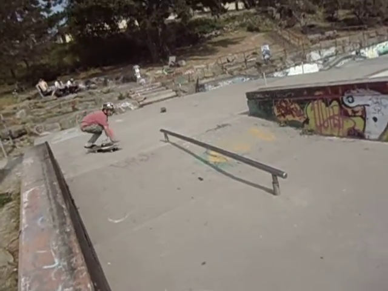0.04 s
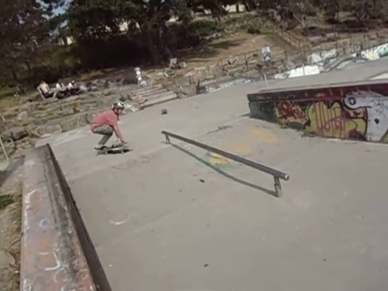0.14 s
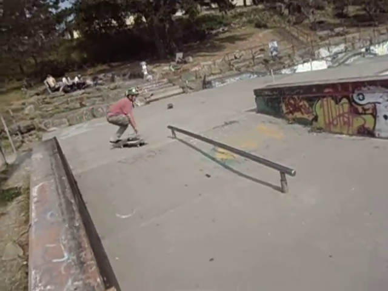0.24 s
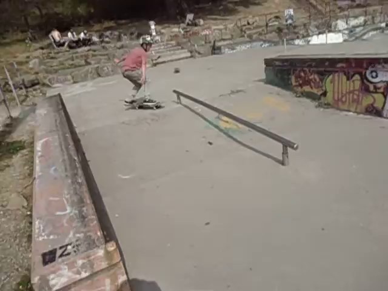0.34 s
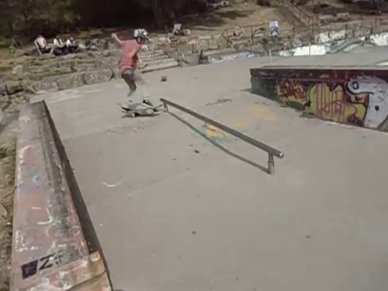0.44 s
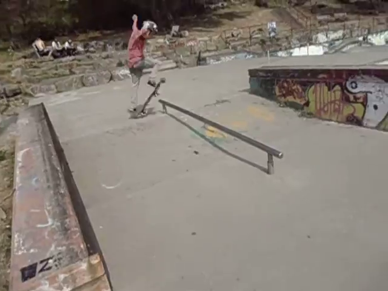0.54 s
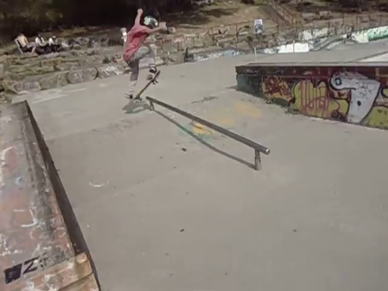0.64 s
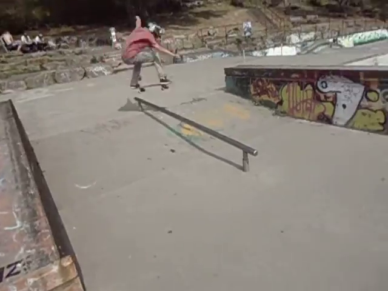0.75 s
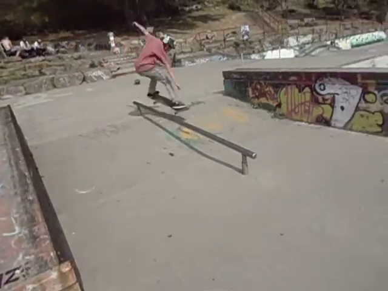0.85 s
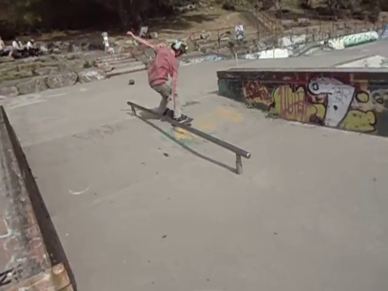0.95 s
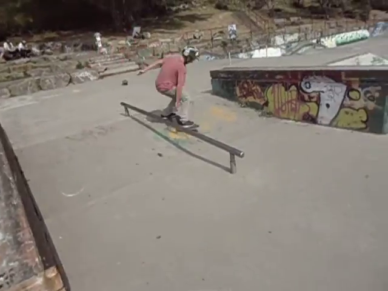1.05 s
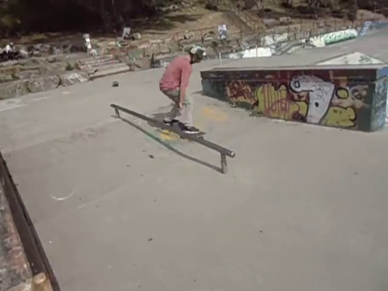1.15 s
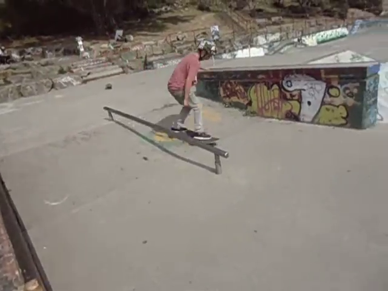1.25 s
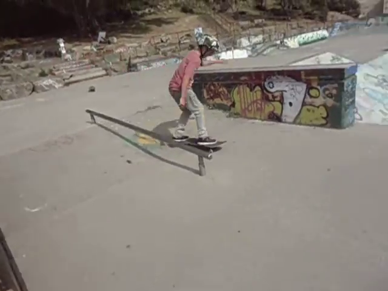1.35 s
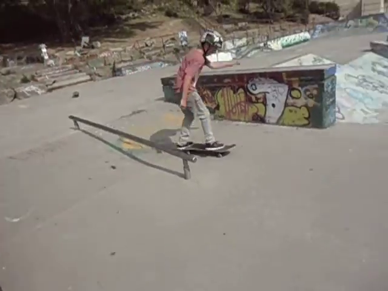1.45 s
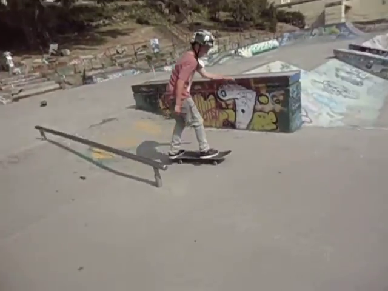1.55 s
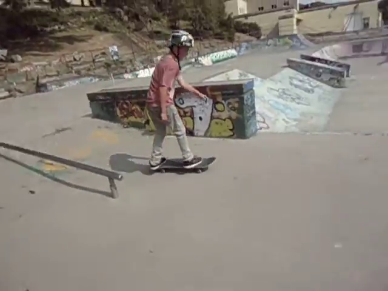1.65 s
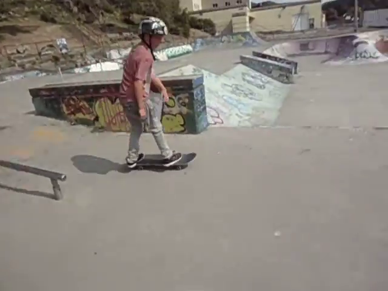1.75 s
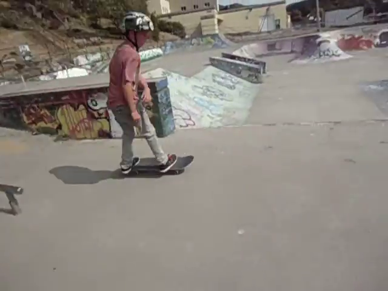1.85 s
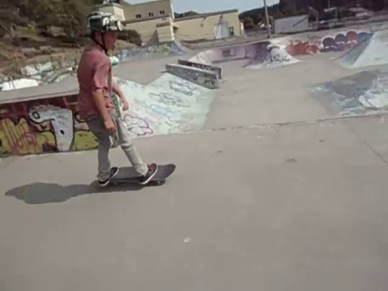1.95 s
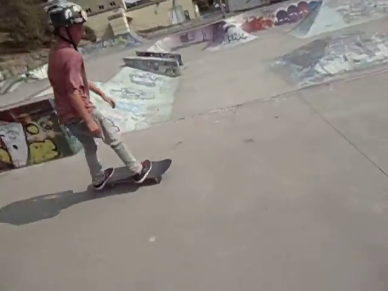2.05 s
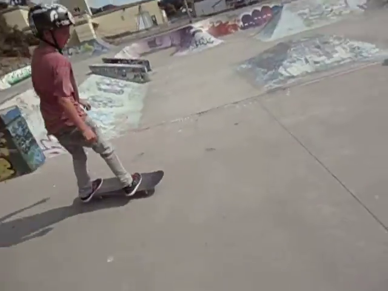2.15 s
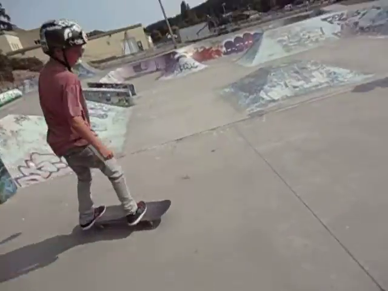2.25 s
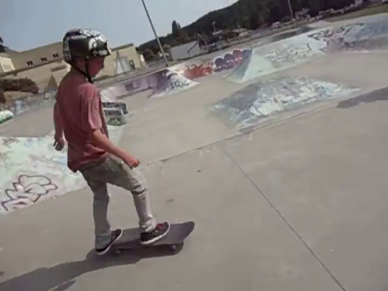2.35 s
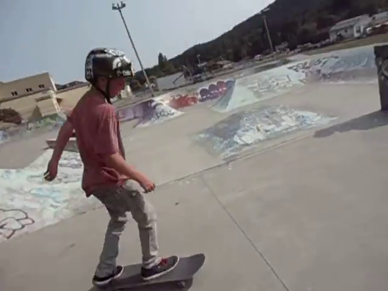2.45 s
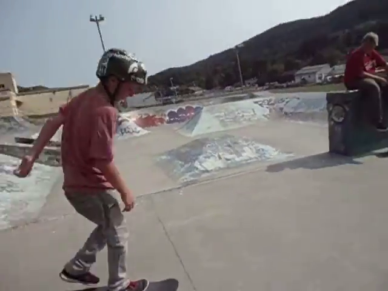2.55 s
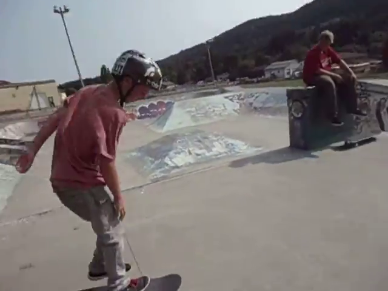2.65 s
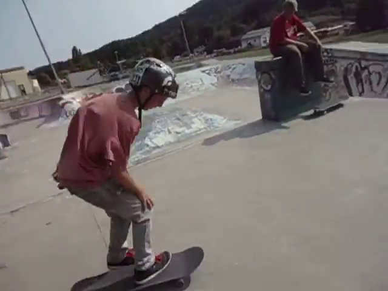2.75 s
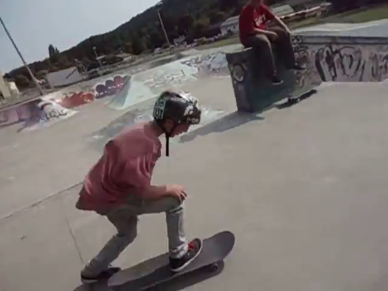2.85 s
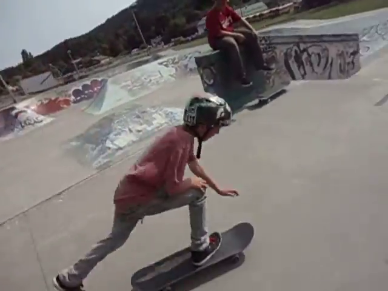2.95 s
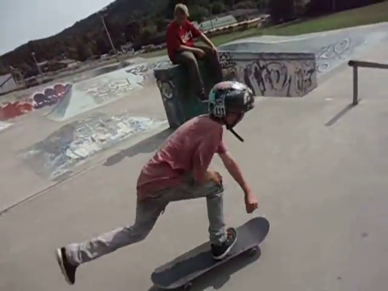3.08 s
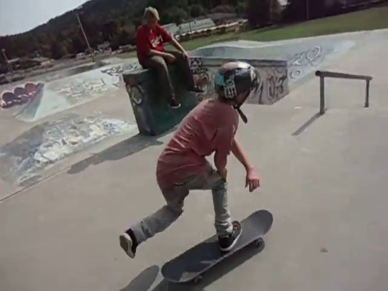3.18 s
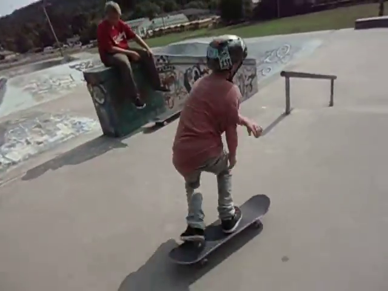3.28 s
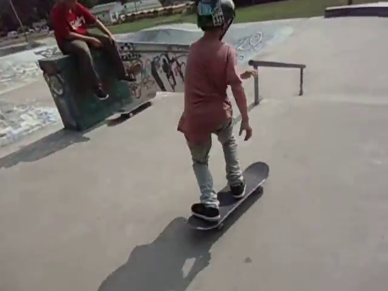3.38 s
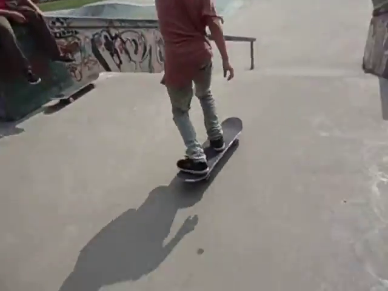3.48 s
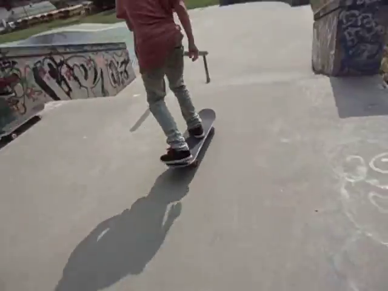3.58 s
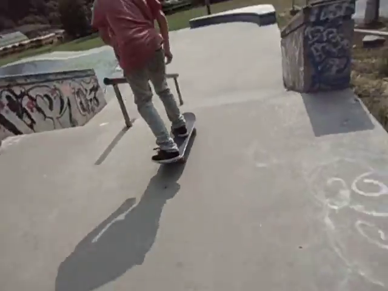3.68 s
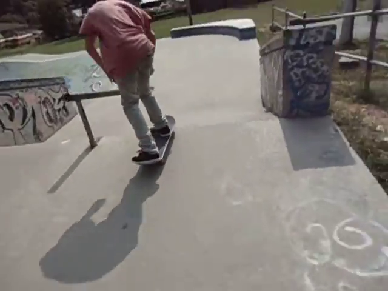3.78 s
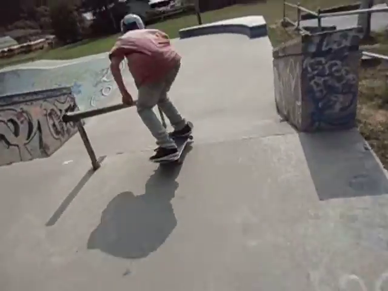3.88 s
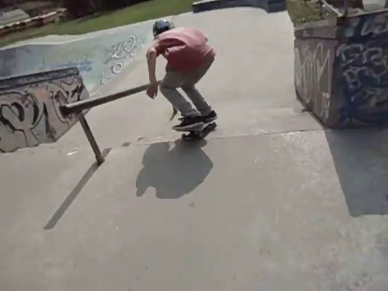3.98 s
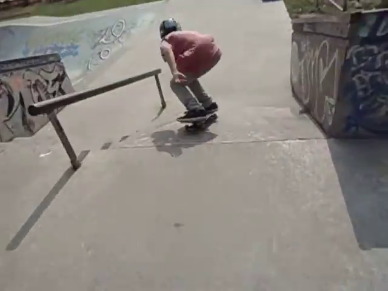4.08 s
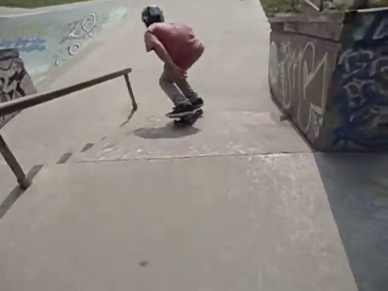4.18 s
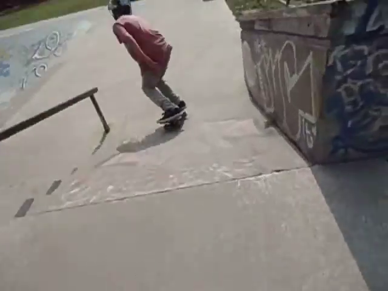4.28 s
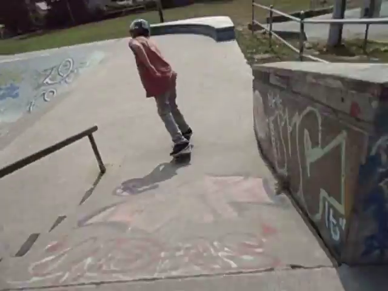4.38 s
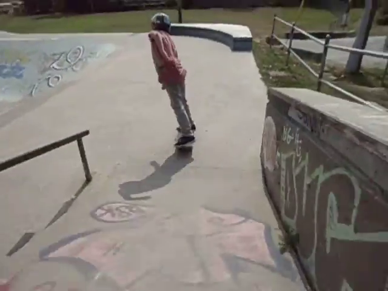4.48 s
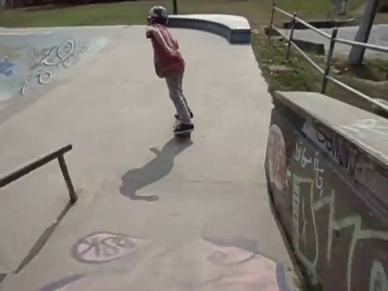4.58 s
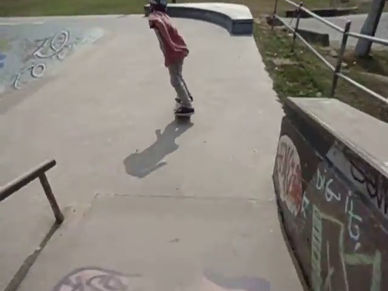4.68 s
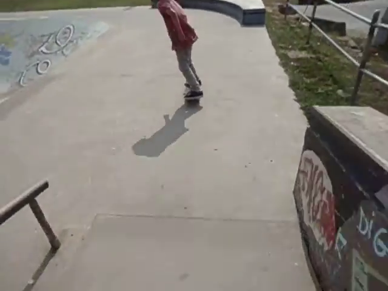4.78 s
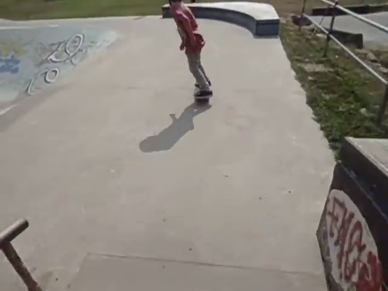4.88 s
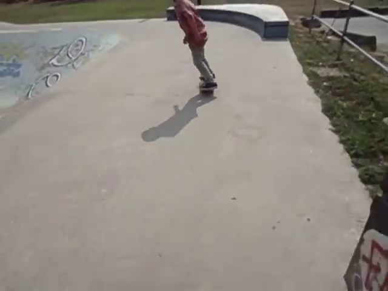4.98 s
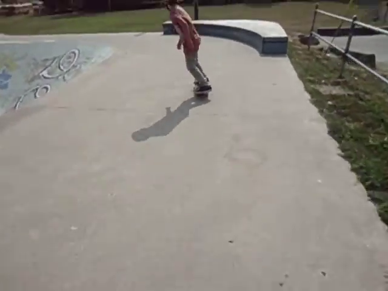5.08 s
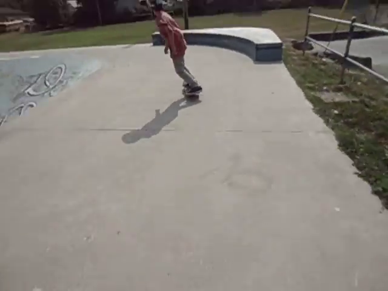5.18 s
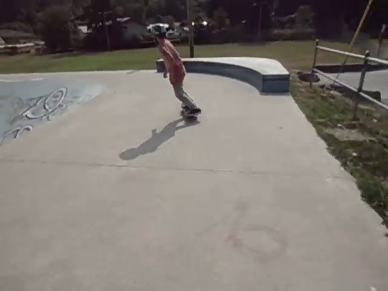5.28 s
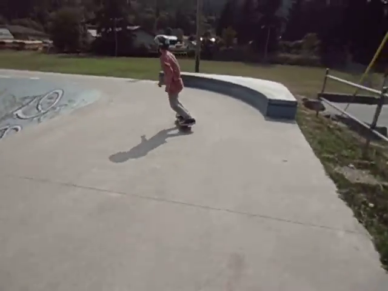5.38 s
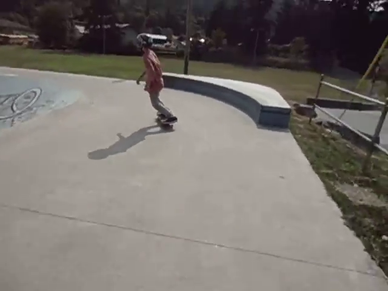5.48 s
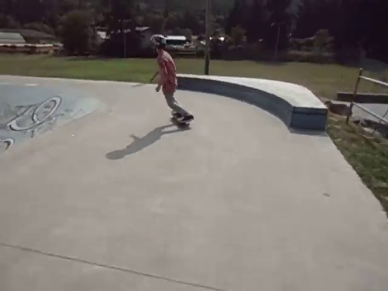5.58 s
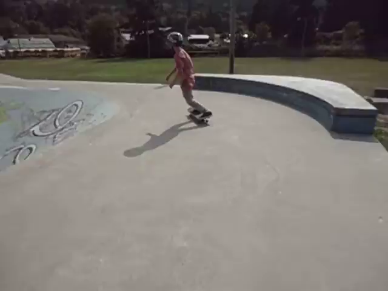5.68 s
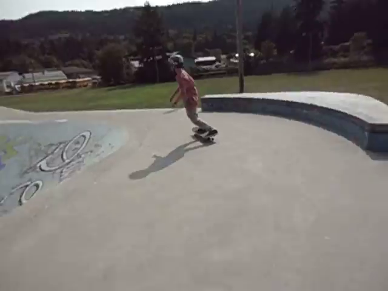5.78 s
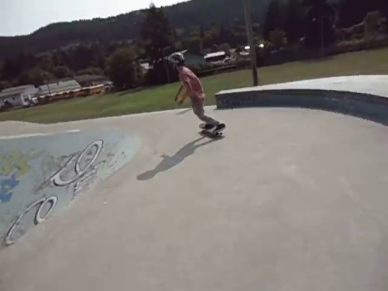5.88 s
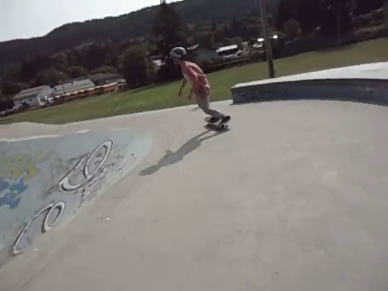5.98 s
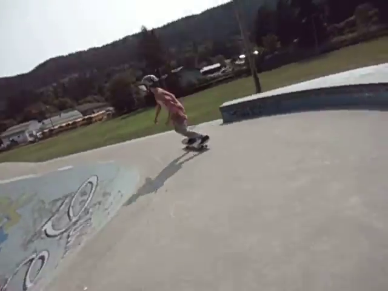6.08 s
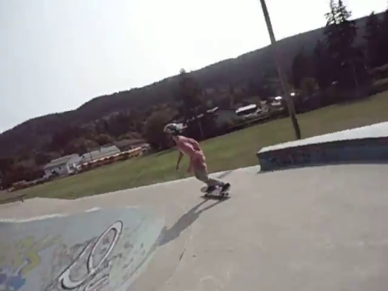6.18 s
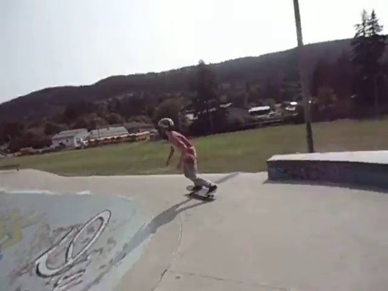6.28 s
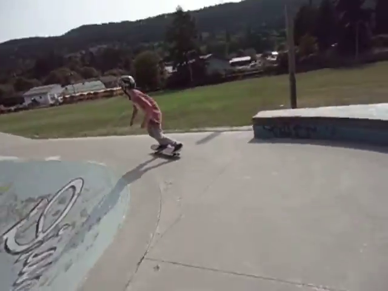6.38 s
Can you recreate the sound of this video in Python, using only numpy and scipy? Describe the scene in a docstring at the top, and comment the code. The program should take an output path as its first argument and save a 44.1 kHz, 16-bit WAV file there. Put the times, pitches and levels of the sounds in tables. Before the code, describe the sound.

Skateboard wheels rumble over smooth, then rough concrete outdoors, with loud board clacks, a short rail scrape and gusts of wind.

```python
"""Skateboarder in a concrete park.

Followed on foot with a small camera, he pops onto a steel rail, grinds, drops off, pushes past, hops a
ridge and carves away over rougher concrete. The wheels rumble over the grain of the ground; grit and
sharp blows ring the deck and trucks. Wind buffets the microphone, once with a thud and a brief rasp."""
import sys
import numpy as np
from scipy import signal
from scipy.fft import rfft, irfft, next_fast_len
from scipy.io import wavfile
from scipy.ndimage import uniform_filter1d

SR = 44100
rng = np.random.default_rng(int(sys.argv[2]) if len(sys.argv) > 2 else 0)


def master_out(mix):
    """Clip the mix to full scale and print it as 16-bit PCM to the path in sys.argv[1]."""
    frames = np.transpose(np.atleast_2d(mix))
    ceiling = np.clip(frames, -1, 1)
    pcm = np.round(ceiling * 32767).astype(np.int16)
    wavfile.write(sys.argv[1], SR, pcm)


N = 283563
TIME = np.arange(N) / SR

# maple deck modes (frequency [Hz], level [dB], t60 [s])
DECK_MODES = [(215, -7, 0.045), (312, -12, 0.03), (515, 0, 0.05), (690, 0, 0.04), (990, -.5, 0.05),
              (1300, -4, 0.045), (1600, -8, 0.035), (2090, -1, 0.035), (2400, -1.5, 0.038),
              (2780, -.5, .034), (3024, -6, .03), (4170, -4, .018), (4490, -4, 0.02)]


def undb(db):
    """Decibels to gain."""
    return np.exp(np.asarray(db) * (np.log(10) / 20))


def unit(x):
    """Scale to rms 1."""
    return x / np.sqrt(np.mean(x ** 2))


def add(out, s, x):
    """Mix x in at time s."""
    i = int(s * SR)
    out[i:i + len(x)] += x[:N - i]


def ramp(s, length_s):
    """Linear rise from 0 to 1, centred on time s."""
    return np.clip((TIME - s) / length_s + .5, 0, 1)


def held(start_s, end_s, rise_s, fall_s):
    """Attack, hold, release."""
    return ramp(start_s, rise_s) * (1 - ramp(end_s, fall_s))


def swell(s, half_s):
    """Bell envelope around time s."""
    return np.exp(-np.minimum(((TIME - s) / half_s) ** 2, 20))


def walk(rate_hz):
    """Smooth random drift, rms 1."""
    k = int(SR / rate_hz)
    steps = np.repeat(rng.standard_normal(N // k + 1), k)
    return unit(uniform_filter1d(steps, k)[:N])


def grains(rate_hz, spread_db):
    """Random tiny impacts, a few much larger than the rest; rms 1."""
    size = undb(spread_db * np.minimum(rng.exponential(size=N), 4))
    return unit((rng.random(N) < rate_hz / SR) * size * rng.choice([-1, 1], N))


def colour(x, spectrum):
    """Filter by (frequency [Hz], gain [dB]) points, -20 dB/oct beyond the ends; rms 1."""
    hz, db = np.transpose(spectrum)
    size = next_fast_len(N, True)
    octave, points = np.log2(np.fft.rfftfreq(size, 1 / SR) + 1), np.log2(hz)
    outside_oct = np.abs(octave - np.clip(octave, points[0], points[-1]))
    gain = undb(np.interp(octave, points, db) - 20 * outside_oct)
    return unit(irfft(rfft(x, size) * gain, size)[:N])


def decay(t, t60_s):
    """Exponential fall, 60 dB in t60_s."""
    return np.exp(-np.log(1000) * t / t60_s)


def ring(modes, t):
    """Decaying modes after one tap; neighbours in antiphase."""
    return sum((-1) ** k * undb(db) * np.sin(2 * np.pi * hz * t) * decay(t, t60_s)
               for k, (hz, db, t60_s) in enumerate(modes))


def strikes(hits, modes, crack_db, crack_t60_s, crack_hz):
    """Each hit is a tap plus contact chatter, ringing the modes over a short noise crack."""
    out, t = np.zeros(N), TIME[:SR // 4]
    octave = np.log2(np.clip(np.fft.rfftfreq(2 * len(t), 1 / SR), 300, 3800) / 1500)
    band = signal.butter(1, crack_hz, "band", fs=SR, output="sos")
    for s, db, tilt_db_oct, chatter_s in hits:
        # rider's weight and contact point shift the modes on each hit
        jitter = rng.standard_normal((len(modes), 2))
        shifted = [(hz * (1 + 0.018 * a), mode_db + 1.7 * b, t60_s)
                   for (hz, mode_db, t60_s), (a, b) in zip(modes, jitter)]
        chatter = (rng.random(len(t)) < 2500 / SR) * rng.standard_normal(len(t)) * np.exp(-t / chatter_s)
        force = chatter / (np.linalg.norm(chatter) + 1e-9)
        force[0] += 1
        ringing = 0.051 * signal.fftconvolve(unit(ring(shifted, t)), force)[:len(t)]
        # longer chatter: longer crack, same energy
        length_s = crack_t60_s + 4 * chatter_s
        noise = unit(signal.sosfilt(band, rng.standard_normal(len(t))))
        crack = undb(crack_db) * np.sqrt(crack_t60_s / length_s) * noise * decay(t, length_s)
        tilted = irfft(rfft(ringing + crack, 2 * len(t)) * undb(tilt_db_oct * octave))
        add(out, s, undb(db) * tilted[:len(t)])
    return out


def rolling(roughness, rumble_db, grit_db, rattle_db):
    """Wheels run over the grain of the concrete; the level flutters as they turn."""
    # rumble on smooth ground, on rough ground and in a carve (frequency [Hz], gain [dB])
    smooth_eq = [(120, -1), (300, -4), (430, -6), (520, 2.5), (610, -2), (720, 0.5), (860, -11.5),
                 (1100, -5.5), (1300, -7.5), (1500, -18), (2200, -37)]
    rough_eq = [(80, -30), (170, -1.5), (320, 3), (520, 0.5), (650, -8), (850, -3), (1100, -5), (1400, -10),
                (1800, -30), (2600, -20.5)]
    carve_eq = [(100, -22), (200, -17.5), (330, 1.5), (430, -0.5), (510, 4.5), (700, -2), (850, -2),
                (1000, -7.5), (1200, -7.5), (1500, -28.5), (2200, -30)]
    # crushed grit, rattling bearings (frequency [Hz], gain [dB])
    grit_eq = [(900, -15), (1400, 8), (1700, 1.5), (2200, -3.5), (2700, -15.5), (3500, -23)]
    rattle_eq = [(2000, -23.5), (2900, 1), (3400, 3), (3850, -1), (4450, 2.5), (5100, 3.5), (6000, 1.5)]
    spin_hz = 21 * (1 + 0.14 * walk(4.1))
    flutter_db = 0.22 * np.sin(2 * np.pi * np.cumsum(spin_hz) / SR) + 1.3 * walk(70)
    carve = 0.82 * ramp(5.33, 0.038)  # the long curve turns the rumble into a drone
    mix = (smooth_eq, 1 - roughness), (rough_eq, roughness * (1 - carve)), (carve_eq, roughness * carve)
    rumble = sum(np.sqrt(share) * colour(grains(5000, spread_db=2), eq) for eq, share in mix)
    # separate grains on smooth concrete, a dense rasp on rough
    sparse_share = .7 * (1 - roughness)
    crunch = np.sqrt(sparse_share) * grains(1100, spread_db=4.2)
    crunch += np.sqrt(1 - sparse_share) * grains(5000, spread_db=3)
    grit = colour(crunch, grit_eq)
    rattle = colour(crunch + grains(3000, spread_db=5), rattle_eq) * undb(2.1 * walk(60))
    return undb(flutter_db) * (rumble * undb(rumble_db) + grit * undb(grit_db) + rattle * undb(rattle_db))


def wheel_contact():
    """Roughness and rumble, grit and rattle levels, set by slab, turns, jumps and distance."""
    # concrete slabs, levels at 1 m (start [s], roughness [~0-1], rumble [dB], grit [dB], rattle [dB])
    slabs = [(0, 0.01, -28, -50, -46), (1.42, 0, -32.5, -59, -45), (1.66, 0.07, -26.5, -32.5, -39.5),
             (2.86, 0.06, -25.5, -37, -46), (3.52, 0.93, -25, -35, -42.5), (4.236, 0.75, -18, -28, -38.5),
             (5.35, 0.99, -19.5, -29.5, -40), (6.01, 1.02, -16, -22, -35.5)]
    # leaning loads the wheels sideways (start [s], lean-in [s], rumble rise [dB])
    turns = [(5.139, 0.17, 10), (6.13, 0.061, 5)]
    # wheels off the concrete (lift [s], touchdown [s], level change [dB])
    jumps = [(0.474, 1.42, -8), (4.048, 4.18, -5.5)]
    # skater to microphone (time [s], distance [m])
    path = [(0, 8.2), (.42, 5.4), (1.5, 4.64), (2.2, 7.4), (2.5, 5.8), (2.88, 2.13), (3.15, 1.54),
            (3.5, 1.87), (3.9, 2.53), (4.45, 2.35), (5.05, 3.21), (6.42, 6.76)]
    crossing_s, relax_s, lift_s = 0.038, 0.81, 0.04
    slab = np.array(slabs[0][1:])[:, None]
    for s, *values in slabs[1:]:  # front and rear wheels cross in turn
        slab = slab + (np.array(values)[:, None] - slab) * ramp(s, crossing_s)
    roughness, rumble_db, grit_db, rattle_db = slab
    load = 0
    for s, lean_s, db in turns:
        lean = ramp(s + lean_s / 2, lean_s) * np.exp(-np.maximum(TIME - s - lean_s, 0) / relax_s)
        load += lean
        rumble_db += db * lean
    distance_m = np.interp(TIME, *np.transpose(path))
    jump_db = sum(db * held(up_s, down_s, lift_s, lift_s) for up_s, down_s, db in jumps)
    heard_db = jump_db - 20 * np.log10(distance_m)
    rasp_db = heard_db - 3.5 * load  # loaded wheels rasp less
    return np.clip(roughness, 0, 1), rumble_db + heard_db, grit_db + rasp_db, rattle_db + rasp_db


def tail_pop():
    """The tail snaps on the concrete and scrapes off."""
    # tail contacts (time [s], level [dB], tilt [dB/oct], chatter [s])
    hits = [(.5595, -8.5, 5, 0.00078), (.5665, -12.5, -6, 0.017)]
    # unloaded tail modes (frequency [Hz], level [dB], t60 [s])
    modes = [(740, -2, .05), (1206, -5, .03), (1550, 0, .04), (1980, -1, .04), (2330, 0, .034),
             (2720, -3, .034), (3650, -2, .02), (4240, -1, .022), (4800, -7, .016)]
    return strikes(hits, modes, crack_db=-0.5, crack_t60_s=0.024, crack_hz=[1200, 5000])


def deck_blows():
    """Sharp blows ring the maple deck."""
    # blows (time [s], level [dB], tilt [dB/oct], chatter [s])
    hits = [(.9328, -5.5, -2.5, 0.0031), (.9385, -6.5, -2, 0.0074), (.942, -6, -2.5, 0.0036),
            (.962, -3, -1, 0.0011), (.968, -7.5, -1.5, 0.003), (.978, -14, -5.5, 0.0015),
            (1.303, -28.5, -2.5, 0.019), (2.426, -29, -1.5, 0.0019), (3.8687, -24.5, -1.5, 0.0036),
            (4.172, -31, -7.5, 0.0029)]
    return strikes(hits, DECK_MODES, crack_db=0.5, crack_t60_s=0.03, crack_hz=[250, 2800])


def hop_pop():
    """The tail clacks on the concrete for the second hop."""
    # clacks (time [s], level [dB], tilt [dB/oct], chatter [s])
    hits = [(3.9633, -6.5, -3.5, 0.00036), (3.9805, -17.5, -5, .003), (4.0144, -21, 0.5, .006)]
    # deck and truck modes under the crouched rider (frequency [Hz], level [dB], t60 [s])
    modes = [(645, -4.5, .05), (750, -1, .03), (825, 0, .024), (996, 2, .016), (1175, -3, .022),
             (1500, -3, .016)]
    return strikes(hits, modes, crack_db=-10.5, crack_t60_s=0.038, crack_hz=[700, 2600])


def knocks():
    """Wheels thwack over joints, higher when glancing; the hit at 5.315 s is a wind buffet's thud."""
    # knocks (time [s], level [dB], tilt [dB/oct], chatter [s], pitch [ratio])
    hits = [(1.427, -30, -4, .005, 0.99), (2.055, -30, -1, .002, 1.4), (2.259, -31, -5.5, .0015, 0.87),
            (2.831, -20, -4.5, 0.0043, 1), (3.3628, -15, -1.5, 0.003, 1.09),
            (3.377, -15.5, -1.5, 0.0085, 0.97), (4.232, -19.5, -9.5, 0.003, 1.26),
            (4.241, -20, -7.5, 0.0065, 1.14), (4.335, -17, -8, 0.015, 1.22),
            (4.373, -18.5, -7, 0.0026, 1.24), (4.771, -15.5, -13, 0.003, 1.8),
            (4.9222, -9.5, -3.5, 0.001, 0.95), (4.9247, -9, -3, 0.004, 0.99),
            (5.315, -15.5, -8, .009, 0.81), (6.182, -20.5, -8, 0.004, 0.99)]
    # loaded wheel and axle modes (frequency [Hz], level [dB], t60 [s])
    wheel_modes = [(665, 1, 0.035), (790, 0.5, 0.013), (1040, -2, 0.038), (1350, 0, 0.023),
                   (1740, -2.5, 0.011), (2260, -4.5, 0.006)]
    out = np.zeros(N)
    for *hit, pitch in hits:
        modes = [(hz * pitch, db, t60_s) for hz, db, t60_s in wheel_modes]
        out += strikes([hit], modes, crack_db=-8.5, crack_t60_s=0.046, crack_hz=[600 * pitch, 1800 * pitch])
    return out


def rail_grind():
    """The trucks land on the rail, then stick and slip along it, scraping and keeping it ringing."""
    # steel rail modes (frequency [Hz], level [dB], t60 [s])
    modes = [(613, 2, 0.06), (975, 7, 0.075), (1130, 1, 0.09), (1530, -3, .13), (1830, -4, .13),
             (2422, -9, .12), (3660, -13, .12)]
    # truck scraping on steel (frequency [Hz], gain [dB])
    scrape_eq = [(300, -13), (550, 8), (1200, 10.5), (2200, -3), (3000, 7.5), (4700, 0.5), (6000, -1)]
    # truck landing (time [s], level [dB], tilt [dB/oct], chatter [s])
    hits = [(.968, -19.5, 3, 0.006)]
    slips = grains(840, spread_db=4)
    steel = unit(signal.fftconvolve(slips, ring(modes, TIME[:SR // 2]))[:N])
    scrape = colour(grains(1000, spread_db=3), scrape_eq) * undb(1.8 * walk(27.75))
    slide = (undb(-64) * steel + undb(-50) * scrape) * held(1, 1.46, rise_s=.04, fall_s=.04)
    return slide + strikes(hits, modes, crack_db=-6, crack_t60_s=0.018, crack_hz=[600, 3000])


def truck_clink():
    """A tap rings a metal truck."""
    # tap (time [s], level [dB], tilt [dB/oct], chatter [s])
    hits = [(2.4372, -23.5, -2, 0.0027)]
    # truck modes (frequency [Hz], level [dB], t60 [s])
    modes = [(2460, -6, 0.025), (3390, 5.5, 0.028), (3700, 2.5, 0.024), (4430, -8, 0.02)]
    return strikes(hits, modes, crack_db=-2.5, crack_t60_s=0.016, crack_hz=[2500, 4200])


def whirrs():
    """Rolling briefly excites wheel and bearing resonances that whirr; the broad rasps falling in pitch near
    3.7 s and 4.3-4.5 s come from the ground's reflection sweeping as the skater moves."""
    # resonances (centre [s], level [dB], half length [s], pitch [Hz], width [Hz], glide [oct/s])
    resonances = [(2.001, -53.5, 0.17, 4000, 1200, -0.15), (2.718, -48, 0.14, 2095, 870, 0),
                  (3.112, -33.5, 0.5, 715.3, 120.6, 0.019), (3.147, -52, 0.25, 1297, 220, 0),
                  (3.7, -31, 0.12, 897.6, 554, -.5), (3.683, -42.5, 0.18, 2175, 700, -1),
                  (4.314, -38, 0.088, 2250, 720, -1), (4.498, -30, 0.069, 1652, 540, -1.03),
                  (5.121, -45.5, 0.24, 3535, 700, 0.058), (6.122, -45, 0.16, 2790, 805, 0),
                  (6.27, -26, 0.14, 672.3, 220, 0)]
    out = np.zeros(N)
    for s, db, half_s, hz, width_hz, glide_oct_s in resonances:
        lowpass = signal.butter(2, width_hz / 2, fs=SR, output="sos")
        cosine, sine = signal.sosfilt(lowpass, rng.standard_normal((2, N)))
        wander_oct = .018 * walk(9)  # shifting wheel load
        pitch_hz = hz * 2 ** (glide_oct_s * np.clip(TIME - s, -.5, .5) + wander_oct)
        phase = 2 * np.pi * np.cumsum(pitch_hz) / SR
        out += undb(db) * swell(s, half_s) * unit(cosine * np.cos(phase) + sine * np.sin(phase))
    return out


def pebbles(roughness, rattle_db):
    """Loose grains crack under the wheels on smooth ground and tick in the deck."""
    t = TIME[:SR // 8]
    tick = ring(DECK_MODES, t) * np.exp(-t / 0.0036)
    ticks = signal.fftconvolve(grains(100, spread_db=3), tick)[:N]
    return unit(ticks) * undb(rattle_db - 2.5) * (1 - roughness)


def stones():
    """Larger grains burst under a wheel: dry snap, brief crumble."""
    # crushed grains (time [s], level [dB])
    bursts = [(2.5701, -29), (2.666, -31), (2.7692, -27.5), (2.8071, -22), (3.3089, -23.5)]
    out, t = np.zeros(N), TIME[:SR // 20]
    band = signal.butter(1, [900, 3200], "band", fs=SR, output="sos")
    envelope = np.exp(-t / .0015) + undb(-10) * np.exp(-t / .008)
    for s, db in bursts:
        add(out, s, undb(db) * signal.sosfilt(band, envelope * rng.standard_normal(len(t))))
    return out


def rasps():
    """Soles rub over grip tape and ground; the rasp at 5.308 s is a wind buffet on the microphone."""
    # rasps (centre [s], level [dB], half length [s])
    bursts = [(0.436, -46, 0.034), (0.532, -40, 0.023), (0.618, -44, 0.021), (0.817, -37, 0.0061),
              (0.919, -44, 0.019), (1.14, -43.5, 0.032), (2.186, -40.5, 0.011), (2.4, -44, 0.037),
              (2.695, -40.5, 0.0089), (3.092, -40, 0.015), (3.227, -41.5, 0.06), (3.324, -33, 0.018),
              (5.308, -33, .016)]
    rasp_eq = [(900, -2), (2000, -3), (3500, -4.5), (4700, 0), (6000, -3)]
    rasp = colour(grains(17000, spread_db=7.5), rasp_eq)
    return rasp * sum(undb(db) * swell(s, half_s) for s, db, half_s in bursts)


def wind():
    """Low turbulence, higher flutter in fast gusts, and single eddies thumping the diaphragm."""
    # turbulence (frequency [Hz], gain [dB])
    air_eq = [(15, -6), (28, 3.5), (65, -1.5), (110, -9.5), (170, -8.5), (280, -19.5), (500, -24),
              (1000, -65.5)]
    # gusts (start [s], end [s], turbulence [dB], flutter [dB])
    gusts = [(0, .45, -57, -41), (0.466, 0.983, -38.5, -35.5), (1.45, 1.67, -39.5, -38),
             (1.87, 1.927, -41, -31), (1.714, 4.06, -38.5, -58), (2.393, 3.5, -32.5, -31),
             (2.87, 3.063, -46, -23), (3.5, 3.9, -51, -54), (4.36, 4.76, -43, -58),
             (4.77, 6.5, -30.5, -44.5), (5.28, 5.36, -24, -21.5), (6.214, 6.5, -29.5, -52)]
    # eddies (time [s], peak [dB], pitch [Hz], half length [s])
    eddies = [(0.697, -17.5, 115, 0.0047), (0.791, -18, 173, 0.0062), (1.465, -23.5, 73, 0.0091),
              (1.872, -21.5, 79, 0.004), (2.553, -11.5, 49.8, 0.0033), (2.77, -19, 121, 0.0016),
              (2.954, -15, 200, 0.0036), (3, -6.5, 295, 0.0015), (3.144, -10, 280, 0.0021),
              (3.297, -16.5, 76, 0.0097), (5.315, -8.5, 45.7, 0.014), (5.314, -8.5, 123.3, 0.0044),
              (5.3178, -8, 300, 0.0028), (5.4, -17, 49.6, 0.0082), (6.038, -15, 49.5, 0.011)]
    breeze_db, flutter_eq = -46.5, [(90, 5), (170, -1), (330, -8), (560, -21)]
    low_power, flutter_power = undb(breeze_db) ** 2, 0
    for start_s, end_s, low_db, flutter_db in gusts:
        gust = held(start_s, end_s, rise_s=0.033, fall_s=0.22)
        low_power += (undb(low_db) * gust) ** 2
        flutter_power += (undb(flutter_db) * gust) ** 2
    rumble = colour(rng.standard_normal(N), air_eq) * np.sqrt(low_power) * undb(2 * walk(35))
    flutter = colour(grains(58, spread_db=2.5), flutter_eq) * np.sqrt(flutter_power)
    thumps = sum(undb(db) * np.cos(2 * np.pi * hz * (TIME - s)) * swell(s, half_s)
                 for s, db, hz, half_s in eddies)
    return rumble + flutter - thumps


def ledge_echo(x, wet_db, t60_s):
    """Thin, dull open-air scatter from ramps and ledges."""
    t = TIME[:SR]
    echo = rng.standard_normal(SR) * decay(t, t60_s) * np.minimum(t / 0.017, 1)
    echo = signal.sosfilt(signal.butter(1, 3500, fs=SR, output="sos"), echo)
    return undb(wet_db) * signal.fftconvolve(x, echo / np.linalg.norm(echo))[:N]


def far_park():
    """Steady wash of the distant park."""
    # ambience (frequency [Hz], gain [dB])
    park_eq = [(30, -9), (400, -15), (1100, -8.5), (5000, -20.5)]
    return undb(-53) * colour(rng.standard_normal(N), park_eq)


def scene():
    """Board, echo, wind and far park; mono."""
    roughness, rumble_db, grit_db, rattle_db = wheel_contact()
    near = rolling(roughness, rumble_db, grit_db, rattle_db)
    near += pebbles(roughness, rattle_db) + stones() + whirrs()
    near += tail_pop() + deck_blows() + hop_pop() + truck_clink() + rail_grind()
    park = far_park()
    near += rasps() + knocks()
    return (near + ledge_echo(near, wet_db=-29, t60_s=0.38) + wind() + park)[None]


def record(dry):
    """Small camera: one faint recorder tick, two loud overload cracks, soft clipping, little treble."""
    # tick and cracks (time [s], peak before clipping [dB])
    spits = [(0.4295, -21.5), (.968, 4.5), (5.3146, 5)]
    ceiling, band_hz, top_hz = .66, 6150, 16000
    spikes = np.zeros(N)
    for s, db in spits:
        add(spikes, s, undb(db) * np.exp(-TIME[:SR // 100] / .00008))
    rounded = ceiling * np.tanh((dry + spikes) / ceiling)
    dull = signal.sosfiltfilt(signal.butter(10, 5280, fs=SR, output="sos"), rounded)
    dull = signal.sosfilt(signal.ellip(8, .2, 70, band_hz, fs=SR, output="sos"), dull)
    leak = undb(-14.5) * uniform_filter1d(spikes, size=2)  # a trace of each spike passes above the band
    return signal.sosfilt(signal.ellip(8, .2, 70, top_hz, fs=SR, output="sos"), dull + leak)


dry = scene()
out = record(dry)
master_out(out)
```